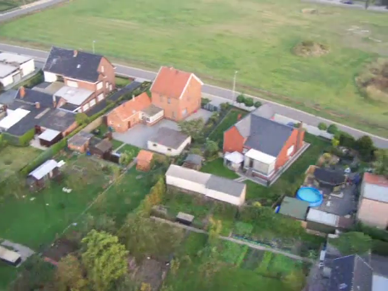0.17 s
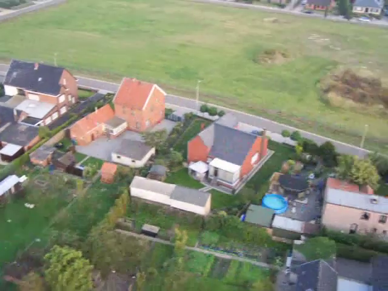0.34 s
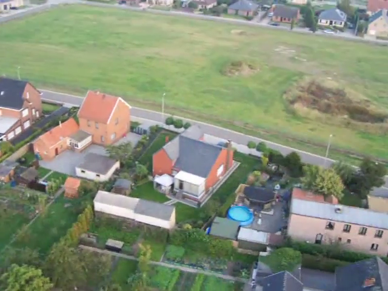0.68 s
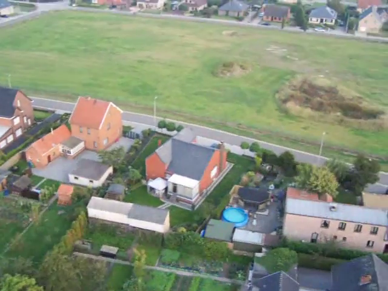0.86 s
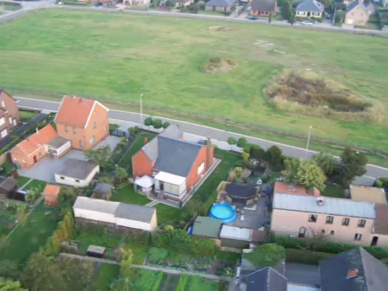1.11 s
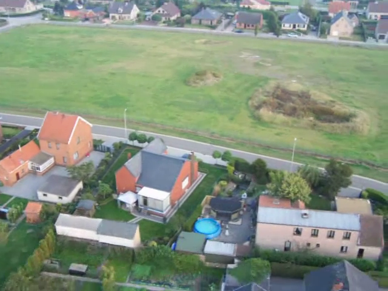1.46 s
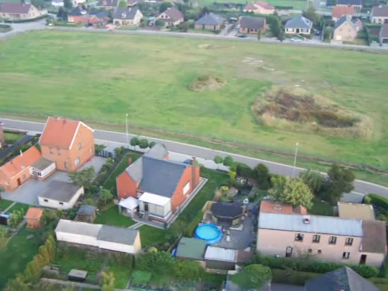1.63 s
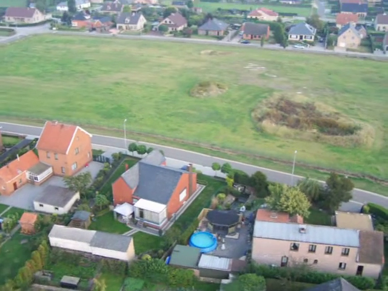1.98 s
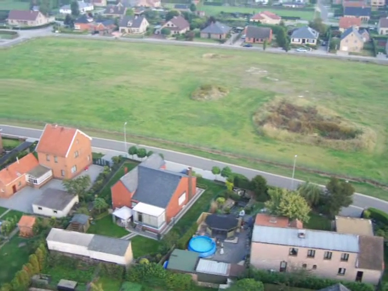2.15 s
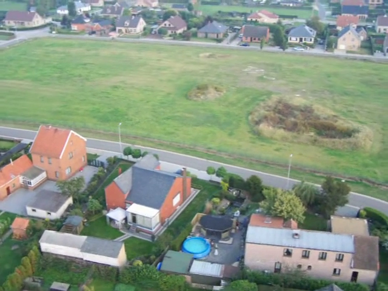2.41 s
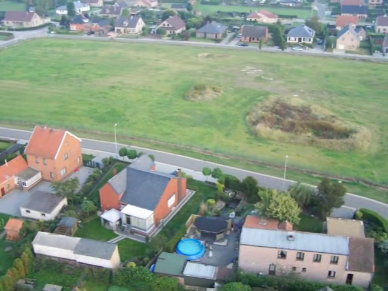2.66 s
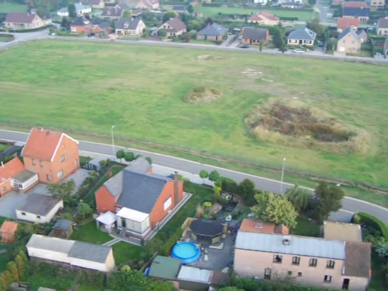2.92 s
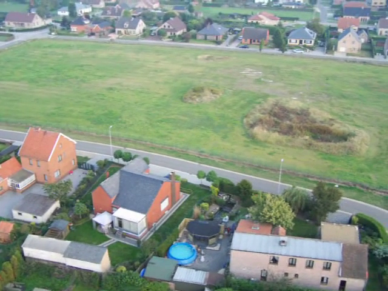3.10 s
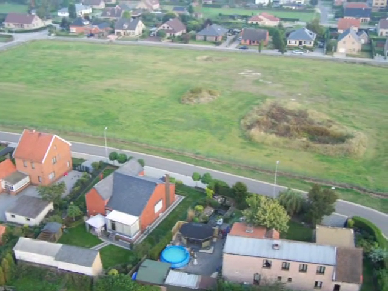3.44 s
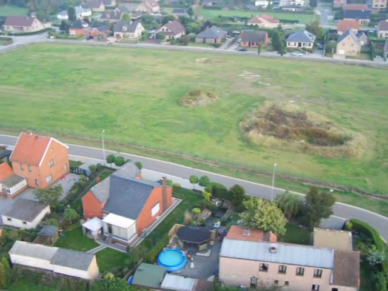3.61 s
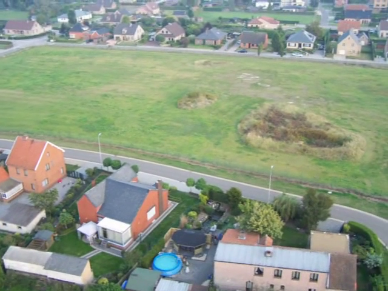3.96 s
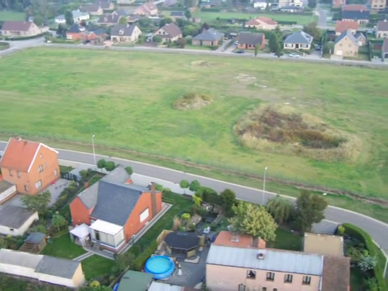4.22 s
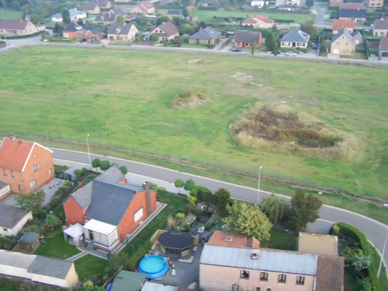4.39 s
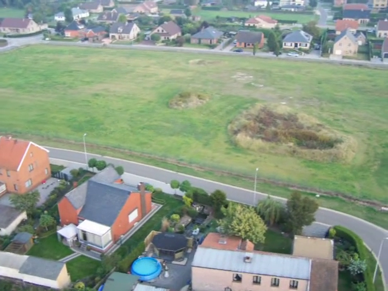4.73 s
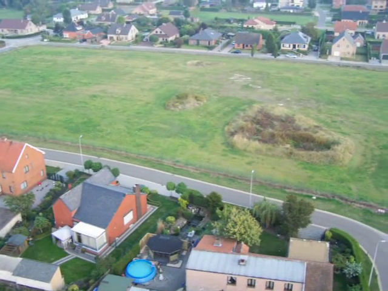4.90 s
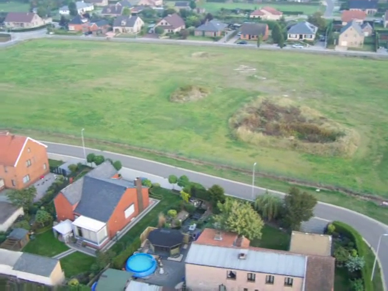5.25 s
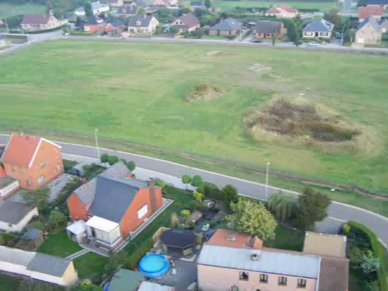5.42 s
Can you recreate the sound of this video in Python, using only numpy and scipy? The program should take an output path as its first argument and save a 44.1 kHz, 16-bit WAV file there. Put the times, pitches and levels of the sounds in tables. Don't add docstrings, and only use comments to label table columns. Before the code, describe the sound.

Loud, deep gas flame blast with a hissing edge starts at full force, stops suddenly, and gives way to faint pilot hiss and crackly clicks.

```python
import sys
import numpy as np
from scipy import signal
from scipy.fft import rfft, irfft, next_fast_len
from scipy.io import wavfile
from scipy.ndimage import uniform_filter1d

SR = 44100
rng = np.random.default_rng(int(sys.argv[2]) if len(sys.argv) > 2 else 0)


def nominal_scale(level):
    x = np.asarray(level, float) / 20
    return 10 ** x


def dump_mix(stems):
    frames = np.atleast_2d(stems).T
    limited = np.clip(frames, -1, 1)
    pcm = np.round(limited * 32767).astype(np.int16)
    wavfile.write(sys.argv[1], SR, pcm)


N = 245195

# frequency in Hz, spectral level in dB per Hz.
GROUND_SPECTRUM = [(12, -59), (20, -17.5), (75, -5), (160, -1.5), (240, -4.5), (294, -2), (416, -5),
                   (442, -2), (612, -3.5), (798, -2.5), (939, -4), (1500, -3.5), (2600, -14.5), (3380, -45),
                   (5720, -120)]
# frequency in Hz, spectral level in dB per Hz.
HISS_SPECTRUM = [(1500, -19), (2200, -9.5), (2900, 0.5), (3600, -2.5), (4100, -5), (4500, -10.5),
                 (5200, -8), (5700, -15.5), (6400, -18), (6900, -25.5), (7800, -31), (9500, -24)]
# centre in seconds, level change in dB, half length in seconds.
PUFFS = [
    (4.5, 1, 0.092),
    (4.8, 1, .1),
    (5.27, -2, .07),
    (5.45, 2, 0.099),
]
# centre in Hz, width in Hz, start in seconds, end in seconds, level in dB.
WHISTLES = [
    (5230, 240, 3.6, 4.3, -53.5),
    (5330, 200, 4.34, 5.04, -56),
    (6350, 200, 4.1, 4.75, -64),
    (6300, 200, 5.24, 5.33, -60),
    (6900, 250, 5.35, 5.4, -56),
    (5600, 2600, 5.34, 5.6, -53),
    (1150, 450, 4.5, 4.85, -34),
]
# time in seconds, peak in dB, ring in Hz, length in ms.
TICKS = [(4.8163, -16.5, 4600, 1.3), (4.9224, -28, 4300, 1.2), (5.0655, -38, 5000, 1.0),
         (5.0752, -35, 4800, 1.0), (5.1278, -33, 4200, 1.8), (5.1454, -20, 3400, 2.6),
         (5.1661, -15, 3900, 1.7), (5.397, -33, 4700, 2.0), (5.481, -31, 4000, 1.2),
         (5.5285, -24, 3800, 2.0), (5.5512, -23, 4100, 1.8), (5.1698, -26, 3700, .8),
         (5.5335, -29, 5000, 1.2), (5.514, -34, 4800, 1.2), (4.425, -34, 5500, 1.0)]
# time in seconds, ring in Hz, level in dB, 60 dB decay time in seconds.
KNOCK = (3.964, 930, -23, .07)
# frequency in Hz, spectral level in dB per Hz.
ROAR_SPECTRUM = [(12, -44.5), (20, -21), (48, -9), (97, -7.5), (142, -0.5), (200, -4), (367, -2.5),
                 (431, -7.5), (517, -7), (729, -12), (1070, -13.5), (1210, -18), (1540, -18.5),
                 (1700, -21.5), (2500, -28.5), (3250, -59.5), (5500, -120)]
# frequency in Hz, spectral level in dB per Hz.
JET_SPECTRUM = [(1500, -23.5), (2000, -6), (2400, -15.5), (2800, -7.5), (3300, -1.5), (4000, -8),
                (4600, -11.5), (5300, -14.5), (6000, -18.5), (6600, -20.5), (7200, -26), (7800, -27),
                (9500, -31)]
# centre in Hz, width in Hz, level change in dB.
FRAME_MODES = [(145, 150, -0.5), (509, 80, 4), (1227, 99, -6), (2150, 250, 0), (2620, 280, 2),
               (2953, 90, 4.5), (3230, 140, -1)]
# time in seconds, level in dB.
PRESSURE = [
    (0, -3),
    (.55, -2),
    (1.0, 0.5),
    (2.0, 0),
    (2.6, 2.5),
    (3.3, 0.5),
    (3.55, -1),
]
# centre in seconds, level change in dB, half length in seconds.
STUMBLES = [
    (1.1, -1.5, 0.12),
    (2.42, -3.5, .06),
]
# time in seconds, first dip in Hz, reflection strength in dB.
TURN = [
    (0, 1900, 4.5),
    (.3, 1840, 11),
    (.65, 1900, 11),
    (1.0, 1780, 12.5),
    (1.5, 1695, 9.5),
    (2.2, 1673, 10.5),
    (3.0, 1645, 6.5),
    (3.9, 1580, 13.5),
]
# centre in Hz when the first dip is at 1700 Hz, share of the slide as an exponent,
# width in Hz, dB per dB of strength, dB added per octave of slide.
COMB = [(1703, 1, 244, -1, 9), (3230, 1, 830, 0.2939, 8.5), (4890, 0.29, 170, -.5, 19.5),
        (2645, .5, 220, -0.1, -24.5), (7000, 0.1, 8400, -0.02, 10)]
# frequency in Hz, gain in dB.
BAND_EDGE = [(7600, -1), (8000, -6), (8400, -12), (8700, -20), (8900, -22.5), (9150, -43), (9400, -75)]


def rms_one(x):
    return x / np.sqrt(np.mean(x ** 2) + 1e-20)


def bumps(rows):
    t = np.arange(N) / SR
    return sum(db * np.exp(-((t - s) / half_s) ** 2) for s, db, half_s in rows)


def drift(rate):
    r = np.exp(-80 * np.pi * rate / SR)
    steps = rng.standard_normal(N // 40 + 2002)
    slow = signal.lfilter([1], [1, -2 * r, r * r], steps)[2000:]
    return np.interp(np.arange(N) / 40, np.arange(len(slow)), rms_one(slow))


def bell(hz, centre_hz, width_hz):
    return 1 / (1 + (2 * (hz - centre_hz) / width_hz) ** 2)


def resonance(x, hz, width_hz):
    r = np.exp(-np.pi * width_hz / SR)
    poles = [1, -2 * r * np.cos(2 * np.pi * hz / SR), r * r]
    return signal.lfilter([(1 - r * r) / 2, 0, (r * r - 1) / 2], poles, x)


def turbulence(spectrum, patchy_db, together_db, modes=()):
    hz = np.maximum(np.fft.rfftfreq(N, 1 / SR), 1)
    point_hz, point_db = np.transpose(spectrum)
    level_db = np.interp(np.log(hz), np.log(point_hz), point_db, left=-90, right=-90)
    for centre_hz, width_hz, mode_db in modes:
        level_db += mode_db * bell(hz, centre_hz, width_hz)
    coloured = rfft(rng.standard_normal(N)) * nominal_scale(level_db)
    place = np.clip(2 * np.log2(hz / 180), 0, 10)
    common_db = together_db * drift(30)
    out = irfft(coloured * np.clip(1 - place, 0, 1), N)
    for band in range(1, 11):
        share = np.clip(1 - np.abs(place - band), 0, 1)
        own_db = patchy_db * (drift(16) + 0.25 * drift(3.8))
        out += irfft(coloured * share, N) * nominal_scale(common_db + own_db)
    return rms_one(out)


def pilot_whistles():
    t = np.arange(N) / SR
    out = np.zeros(N)
    for hz, width_hz, start, end, level_db in WHISTLES:
        band = resonance(resonance(rng.standard_normal(N), hz, width_hz), hz, width_hz)
        fade = np.interp(t, [start - .05, start + 0.022, end - .03, end + .05], [0, 1, 1, 0])
        out += nominal_scale(level_db + 0.79 * drift(6.3)) * rms_one(band) * fade
    return out


def background():
    ducked_db, release_s, recovery_s = -16.5, 3.826, 0.24
    ground_db, hiss_db, hiss_duck_share = -28, -38.5, 0.82
    duck_db = ducked_db * np.clip(1 - (np.arange(N) / SR - release_s) / recovery_s, 0, 1)
    ground_gain = nominal_scale(ground_db + duck_db)
    hiss_gain = nominal_scale(hiss_db + hiss_duck_share * duck_db + bumps(PUFFS))
    ground = ground_gain * turbulence(GROUND_SPECTRUM, patchy_db=0.1, together_db=0.76)
    hiss = hiss_gain * turbulence(HISS_SPECTRUM, patchy_db=0.7, together_db=0.9)
    return ground + hiss + pilot_whistles()


def rigging_ticks():
    high_ring_hz, high_ring_follows, high_ring_db = 6700, .3, -7
    out, t = np.zeros(N + 900), np.arange(900) / SR
    grit = rng.standard_normal((len(TICKS), 900))
    crack_filter = signal.butter(2, [2700, 5900], "band", fs=SR, output="sos")
    for (s, peak_db, hz, length_ms), noise in zip(TICKS, grit):
        burst = noise * np.exp(-(t * 1000 / length_ms) ** 1.4)
        burst[:3] += 1.0
        crack = rms_one(signal.sosfilt(crack_filter, burst))
        low_ring = rms_one(resonance(burst, hz, 600))
        high_hz = high_ring_hz * (hz / 4000) ** high_ring_follows
        high_ring = rms_one(resonance(burst, high_hz, 700))
        sound = .9 * crack + low_ring + nominal_scale(high_ring_db) * high_ring
        typical = np.sqrt(np.sum(sound ** 2) * 1000 / (length_ms * SR))
        at = round(s * SR)
        out[at:at + 900] += nominal_scale(peak_db) * .55 * sound / typical
    return out[:N]


def valve_knock():
    s, hz, level_db, t60 = KNOCK
    t = np.maximum(np.arange(N) / SR - s, 0)
    return nominal_scale(level_db - 60 * t / t60) * np.sin(2 * np.pi * hz * t) * (1 - np.exp(-t / .002))


def reflections(x):
    swell_hz, swell_width_hz, swell_db = 635, 160, 4
    swell_from_s, swell_rise_s = 2.97, 0.2
    hz, s, frames = signal.stft(x, SR, nperseg=1024)
    hz = hz[:, None]
    when, dip_hz, strength_db = np.transpose(TURN)
    slide = np.interp(s, when, dip_hz) / 1700
    strength_db = np.interp(s, when, strength_db)
    swell = np.clip((s - swell_from_s) / swell_rise_s, 0, 1)
    shape_db = swell_db * swell * bell(hz, swell_hz, swell_width_hz)
    for centre_hz, follows, width_hz, share, tilt_db in COMB:
        depth_db = share * strength_db + tilt_db * np.log2(slide)
        shape_db = shape_db + depth_db * bell(hz, centre_hz * slide ** follows, width_hz)
    return signal.istft(frames * nominal_scale(shape_db), SR, nperseg=1024)[1][:N]


def burner():
    roar_full_db, jet_full_db, roar_follows = -16.5, -30, 0.09
    closing_s, closing_db_per_s, jet_closes_faster = 3.733, 28.5, 1.6
    collapse_s, collapse_db_per_s = 3.885, 137
    t = np.arange(N) / SR
    pressure_db = np.interp(t, *np.transpose(PRESSURE)) + bumps(STUMBLES)
    closing_db = -closing_db_per_s * np.maximum(t - closing_s, 0)
    collapse_db = -collapse_db_per_s * np.maximum(t - collapse_s, 0)
    roar_db = roar_full_db + roar_follows * pressure_db + closing_db + collapse_db
    jet_db = jet_full_db + pressure_db + jet_closes_faster * closing_db + collapse_db
    roar = nominal_scale(roar_db) * turbulence(ROAR_SPECTRUM, patchy_db=.5, together_db=0.63, modes=FRAME_MODES)
    jet = nominal_scale(jet_db) * turbulence(JET_SPECTRUM, patchy_db=.5, together_db=.7, modes=FRAME_MODES)
    return reflections(roar + jet)


def scene():
    mix = background() + rigging_ticks() + valve_knock() + burner()
    return mix[None, :]


def top_cut(x):
    return signal.sosfilt(signal.butter(12, 8830, fs=SR, output="sos"), x)


def record(dry):
    squared = dry ** 2
    bent = dry - .12 * (squared - uniform_filter1d(squared, 4001))
    size = next_fast_len(N + 2048)
    hz = np.fft.rfftfreq(size, 1 / SR)
    edge = nominal_scale(np.interp(hz, *np.transpose(BAND_EDGE), right=-150))
    limited = irfft(rfft(bent, size) * edge, size)[:, :N]
    return top_cut(limited)


dry = scene()
out = record(dry)
dump_mix(out)
```